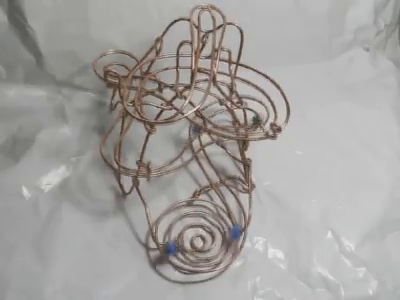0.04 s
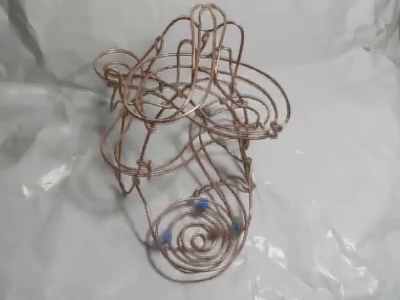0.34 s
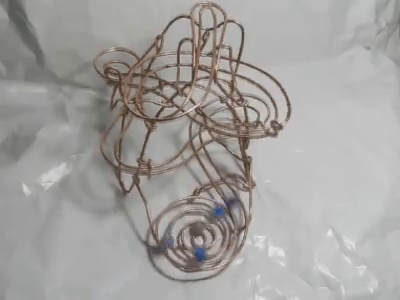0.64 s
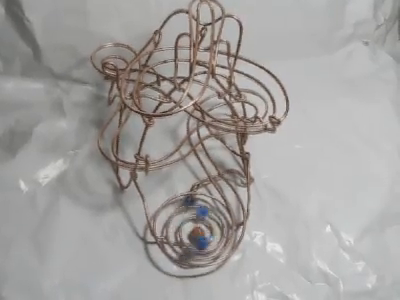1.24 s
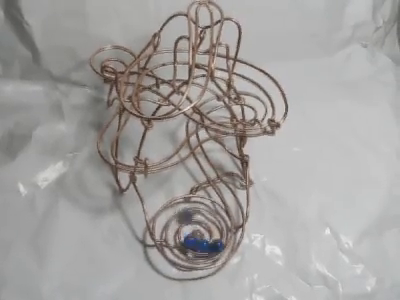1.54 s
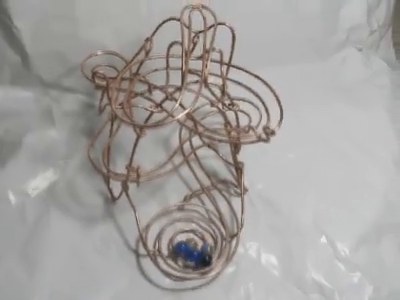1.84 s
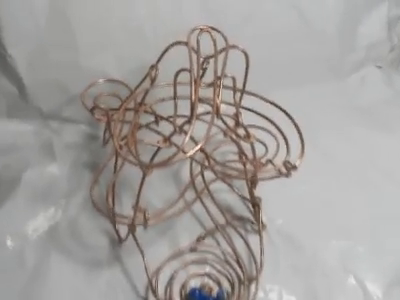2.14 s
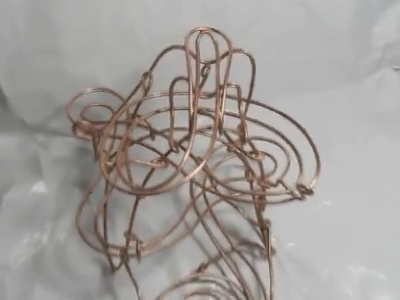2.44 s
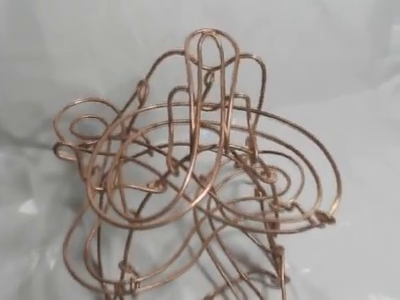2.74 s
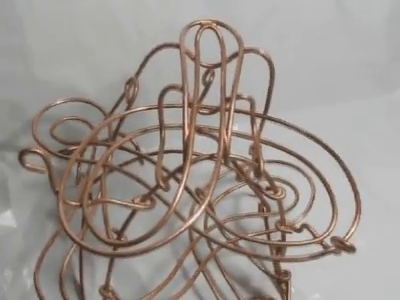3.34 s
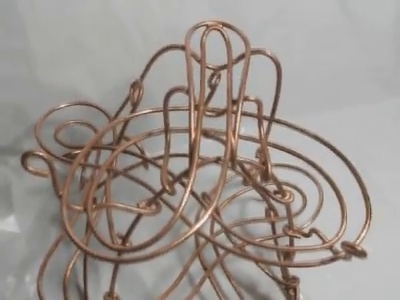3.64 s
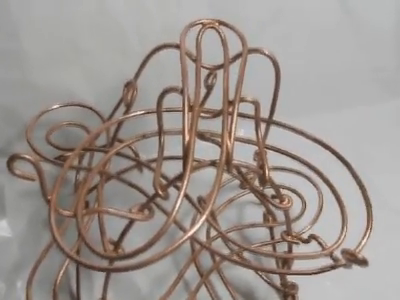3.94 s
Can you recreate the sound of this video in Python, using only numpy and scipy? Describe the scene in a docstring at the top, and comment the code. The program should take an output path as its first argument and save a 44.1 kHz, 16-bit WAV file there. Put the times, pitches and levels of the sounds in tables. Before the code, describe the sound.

Small balls roll along a wire spiral with a bright metallic rattle, a light rumble and many irregular clacks. The rolling fades from about 1.5 seconds and settles after a last sharp clack at 1.7. From 1.9 seconds, a hand on the microphone makes short hollow knocks, then softer bumps, faint rubbing and a low groan around 2.6. The balls tick occasionally in the quiet room until nearly 4 seconds.

```python
"""Small balls roll and rattle down the spiral funnel of a copper wire track, clack together at its
centre and settle. Each contact is an impulse that excites the resonant modes of the wire frame.
Then a hand moves the camera: friction and slips drive the modes of its hollow case, giving a faint
rub, short knocks and a low groan, while the balls tick now and then in a quiet room."""
import sys
import numpy as np
from scipy import signal
from scipy.fft import rfft, irfft, next_fast_len
from scipy.io import wavfile
from scipy.ndimage import uniform_filter1d, map_coordinates

SR = 44100
rng = np.random.default_rng(int(sys.argv[2]) if len(sys.argv) > 2 else 0)


def to_wav(sig):
    """Store sig (one row per channel, or 1-D mono) as 16-bit WAV at the path in sys.argv[1].

    Samples outside -1..1 are clipped; the rate is SR.
    """
    pcm = np.clip(np.atleast_2d(sig), -1, 1) * 32767
    pcm = np.round(pcm).astype(np.int16)
    wavfile.write(sys.argv[1], SR, pcm.T)  # frames by channels


N = 176400


def amp(db):
    return 10 ** (np.asarray(db) / 20)


def unit_rms(x):
    return x / np.sqrt(np.mean(x ** 2) + 1e-20)


def along(points, hz):
    """Interpolation of (frequency, value) points on a logarithmic axis."""
    f, v = np.transpose(points)
    return np.interp(np.log(hz + 1), np.log(f + 1), v)


def curves(rows):
    """Linear interpolation in time: one envelope for each column after the first."""
    times, *columns = np.transpose(rows)
    return [np.interp(np.arange(N) / SR, times, column) for column in columns]


def wobble(knots_per_s):
    """Smooth random modulation: a spline through Gaussian knots."""
    return map_coordinates(rng.standard_normal(2048), [np.arange(N) * knots_per_s / SR], mode="mirror")


def filtered(x, gain):
    """Zero-phase filtering: the spectrum is multiplied by gain(hz)."""
    size = next_fast_len(N + SR // 2)
    return irfft(rfft(x, size) * gain(np.fft.rfftfreq(size, 1 / SR)), size)[:N]


def noise(gain):
    """Spectral shaping of white noise, at unit RMS."""
    return unit_rms(filtered(rng.standard_normal(N), gain))


def resonances(modes, hz, low_hz):
    """Damped modes add in power; the body radiates little below low_hz."""
    power = sum(amp(db) ** 2 * (hz * width) ** 2 / ((centre ** 2 - hz ** 2) ** 2 + (hz * width) ** 2)
                for centre, width, db in modes)
    return np.sqrt(power / (1 + (low_hz / (hz + 1)) ** 8))


def impulse_response(gain, lag_s=0., size=4096):
    """Minimum phase plus dispersion: bending waves bring 1 kHz lag_s late, the bass later."""
    hz = np.fft.rfftfreq(size, 1 / SR)
    cepstrum = irfft(np.log(np.maximum(gain(hz), 1e-4)))
    cepstrum[1:size // 2] *= 2
    cepstrum[size // 2 + 1:] = 0
    dispersion = 4 * np.pi * lag_s * np.sqrt(1000 * hz)
    response = irfft(np.exp(rfft(cepstrum) - 1j * dispersion))
    return response / np.linalg.norm(response)


def tail(t60s):
    """Diffuse decay of unit energy: each frequency dies exponentially at its own rate."""
    hz, t, spectra = signal.stft(rng.standard_normal(SR // 4), SR, nperseg=128)
    response = signal.istft(spectra * amp(-60 * t / along(t60s, hz)[:, None]), SR, nperseg=128)[1]
    return response / np.linalg.norm(response)


def add(out, start_s, sound):
    """Superposition of a sound from start_s on."""
    i = max(round(start_s * SR), 0)
    out[i:i + len(sound)] += sound[:len(out) - i]


# Modes of the wire frame: (frequency [Hz], bandwidth [Hz], level [dB])
WIRE_MODES = [(1190, 203, -6.5), (1720, 43, -5.5), (2100, 170, -4.5), (2516, 119, 2), (3290, 196, -5.5),
              (3694, 81, -8.5), (5040, 840, -24), (6280, 430, -23), (7570, 500, -14.5), (8555, 158, -9.5),
              (9340, 1200, -25.5), (12400, 260, -17), (13580, 260, -14), (13800, 1950, -19.5)]


def wire_gain(hz):
    """Modal response of the wire frame."""
    return resonances(WIRE_MODES, hz, low_hz=567)


# Damping of the frame: (frequency [Hz], 60 dB decay time [s])
WIRE_DECAY = [(300, 0.023), (2500, 0.1), (8000, 0.15), (14000, 0.03)]


def frame_ring(bumps, step_s):
    """Dense modes ring differently as the contact point moves, over the first half of the scene."""
    out, hop = np.zeros(N), int(step_s * SR)
    for i in range(0, N // 2, hop):
        add(out, i / SR, signal.fftconvolve(bumps[i:i + hop], tail(WIRE_DECAY)))
    return out


def drifting(x, depth_db):
    """Modal coupling depends on position: bands swell and fade as the contacts travel."""
    spectra = signal.stft(x, nperseg=1024)[2]
    field = uniform_filter1d(rng.standard_normal(spectra.shape), size=5, axis=0)
    field = uniform_filter1d(field, size=9, axis=1)
    return unit_rms(signal.istft(spectra * amp(depth_db * unit_rms(field)), nperseg=1024)[1][:N])


# Rolling envelopes: (time [s], relative rumble level [dB], relative rattle level [dB])
ROLL_LEVELS = [(0, -30.5, -24), (.18, -28.5, -27.5), (.42, -29, -26.5), (.49, -27, -29.5),
               (.555, -29.5, -24.5), (.61, -28.5, -23), (.66, -35, -32.5), (.8, -33, -29), (.9, -32.5, -30),
               (1.03, -31, -26.5), (1.13, -31, -30.5), (1.21, -31, -26), (1.3, -30.5, -30.5),
               (1.39, -30.5, -27.5), (1.45, -33.5, -33), (1.49, -38.5, -40), (1.6, -37.5, -41.5),
               (1.66, -45, -47), (1.735, -34.5, -34), (1.79, -48, -52), (1.86, -59.5, -55)]
# Spectrum of the rumble: (frequency [Hz], level [dB])
RUMBLE_SPECTRUM = [(60, -31), (200, -11), (330, -7), (450, -5), (580, 2.5), (760, 0), (950, -1), (1250, 0),
                   (1800, -6), (2600, 1), (5000, -52)]


def rolling(balls=4, bumps_per_s=1300, spread_db=2.5, rattle_db=-1.5, rumble_db=-2.5):
    """Roughness excitation: balls bump over the wire, making a bright rattle above a low rumble."""
    rumble_curve, rattle_curve = curves(ROLL_LEVELS)
    rattle = np.zeros(N)
    for _ in range(balls):
        bumps = (rng.random(N) < bumps_per_s / balls / SR) * rng.choice([-1, 1], N)
        bumps = bumps * amp(spread_db * np.clip(rng.standard_normal(N), -2, 2))
        ring = amp(-4) * frame_ring(bumps, step_s=.12)
        rattle += (bumps + ring) * amp(1.2 * wobble(4.57))
    rattle = unit_rms(signal.fftconvolve(rattle, impulse_response(wire_gain, lag_s=0.001024))[:N])
    rumble = noise(lambda hz: amp(along(RUMBLE_SPECTRUM, hz)))
    flutter_db = 0.55 * wobble(90.5)
    rattle = drifting(rattle, depth_db=2) * amp(rattle_db + rattle_curve + flutter_db)
    rumble = drifting(rumble, depth_db=2) * amp(rumble_db + rumble_curve + 0.3 * flutter_db)
    settling, = curves([(1.82, 1), (1.92, 0.53)])
    return settling * (rattle + rumble)


# Spectrum of the room noise: (frequency [Hz], level [dB])
AIR_SPECTRUM = [(20, -18.5), (55, -11.5), (119, -16.5), (190, -10), (280, -18), (360, -10), (666, -13.5),
                (820, -10), (1110, -18), (1250, -17), (1750, -22), (3440, -23), (4150, -26.5), (10900, -36),
                (13900, -37), (15500, -36)]
# Faint resonances in that noise: (frequency [Hz], bandwidth [Hz], level [dB])
AIR_PEAKS = [(2300, 53, 2.5), (3320, 87, -3), (7720, 320, -11), (8900, 200, -23), (10400, 200, -16),
             (12300, 500, -21), (13760, 300, -17)]
# Envelope of the room noise: (time [s], level [dB])
AIR_LEVELS = [(0, -38), (1.9, -49.5), (2.3, -48), (2.8, -45.5), (4, -45.5)]


def background(hum_hz=117.4, hum_db=-64.5):
    """Ambient noise floor: broadband room noise with faint resonances, and a tonal mains hum."""
    level_db, = curves(AIR_LEVELS)
    air = noise(lambda hz: amp(along(AIR_SPECTRUM, hz)))
    air += amp(-13.5) * noise(lambda hz: resonances(AIR_PEAKS, hz, low_hz=1500))
    hum = unit_rms(np.sin(2 * np.pi * hum_hz * np.arange(N) / SR))
    return air * amp(level_db) + hum * amp(hum_db)


def chatter(decay_s, grit_db):
    """Contact bounce: one impulse, then a spectrally flat burst of tiny rebounds."""
    t = np.arange(SR // 10) / SR
    fade = amp(-60 * t / decay_s)
    spectrum = rfft(rng.standard_normal(len(t)) * fade)
    burst = irfft(spectrum / np.abs(spectrum), len(t)) * np.sqrt(fade)
    burst *= amp(grit_db) / np.linalg.norm(burst)
    burst[0] += 1
    return burst / np.linalg.norm(burst)


# Balls striking the wire and each other: (time [s], relative level [dB], chatter decay [s])
BALL_IMPACTS = [(0.0265, -5, 0.17), (0.058, -9, 0.15), (0.2771, -7.5, 0.076), (.298, -10.5, 0.081),
                (.389, -9, 0.055), (.4045, -6, 0.076), (0.525, -14, 0.049), (.556, -13.5, 0.029),
                (0.5927, -12, 0.028), (0.6276, -8, 0.075), (0.6337, -7, 0.034), (0.679, -11, 0.077),
                (0.717, -13, 0.046), (.744, -19, .03), (0.785, -20, 0.025), (.818, -9.5, 0.094),
                (.8335, -12, .06), (0.885, -12, 0.087), (.967, -11, .06), (.983, -13.5, .04),
                (1.0325, -8.5, 0.11), (1.1822, -11.5, 0.036), (1.2012, -9.5, 0.073), (1.256, -12, 0.083),
                (1.3356, -7, 0.054), (1.371, -6, 0.051), (1.421, -7, 0.072), (1.4465, -9, 0.041),
                (1.49, -19, .03), (1.7049, -21, 0.03), (1.7155, -6.5, 0.039), (1.731, -19.5, 0.043),
                (1.743, -24, .04)]


def clacks(gain_db=11, focus=0.83, focus_per_s=4):
    """Impact excitation of the frame: the longer a ball chatters, the more the main modes stand out."""
    out = np.zeros(N)
    brightness = [(800, -1.5), (2500, 3), (5000, 8), (14000, 0)]  # (frequency [Hz], gain [dB])
    for start_s, db, decay_s in BALL_IMPACTS:
        gain = lambda hz: wire_gain(hz) ** (focus + focus_per_s * decay_s) * amp(along(brightness, hz))
        ring = impulse_response(gain, lag_s=0.000989)
        add(out, start_s, amp(gain_db + db) * signal.fftconvolve(chatter(decay_s, grit_db=19), ring))
    return out


# Light contacts between balls: (time [s], relative level [dB], share of ping [0-1])
BALL_TOUCHES = [(1.583, -26, 0.1), (1.619, -25.5, 0), (1.635, -30, 0), (1.758, -25, 0), (1.777, -31, 0.3),
                (1.8735, -22.5, 0.1), (2.346, -39, 0), (2.3734, -23, 0.1), (2.5544, -30, 0),
                (2.7182, -22.5, 0.53), (2.9317, -22, 0.18), (3.1357, -28.5, 0), (3.584, -25.5, 0)]
# Spectrum of a tick: (frequency [Hz], level [dB])
TICK_SPECTRUM = [(300, -19), (1200, -16), (1900, -9), (2500, -0.5), (4700, -4), (7000, -6.5), (9000, -14),
                 (11500, -22), (14500, -17)]
# Modes of a short span of wire: (frequency [Hz], level [dB], 60 dB decay time [s])
PING_MODES = [(4640, -3.5, 0.05), (5420, -9, .035), (6379, -3.5, 0.034), (14600, -8, .03)]


def ticks(tick_db=11.5, ping_db=-1):
    """Light impacts as the balls shift; some set a short span of wire into free vibration."""
    out = np.zeros(N)
    ring = impulse_response(lambda hz: amp(along(TICK_SPECTRUM, hz)))
    t = np.arange(SR // 8) / SR
    ping = sum(amp(db - 60 * t / t60) * np.sin(2 * np.pi * hz * t) for hz, db, t60 in PING_MODES)
    for start_s, db, share in BALL_TOUCHES:
        add(out, start_s, amp(tick_db + db) * signal.fftconvolve(chatter(0.063, grit_db=4), ring))
        add(out, start_s, amp(ping_db + db) * share * ping)
    return out


# Modes of the camera case: (frequency [Hz], bandwidth [Hz], level [dB])
CASE_MODES = [(360.2, 19, 4), (469, 39, 2.5), (606, 29, 3.5), (665, 54, 4), (945, 57, 1.5),
              (1122, 97, -5.5), (1247, 49, -3), (1400, 72, -6), (1630, 96, -8.5), (2605, 260, -8),
              (3210, 120, -12.5), (8160, 690, -18), (9560, 150, -17), (10370, 48, -19.5),
              (11480, 100, -16.5), (13050, 370, -18.5), (13600, 620, -26)]
# Hand rubbing the case: (time [s], relative level [dB])
RUB_LEVELS = [(1.9, -11), (2.35, -9), (2.42, -13), (2.55, -1), (2.68, 1), (2.75, -1.5), (3.0, -4), (3.1, 6),
              (3.2, -10), (3.32, 3.5), (3.62, -1), (3.76, 9.5), (3.83, -3.5), (4, 3)]


def rub(gain_db=-49):
    """Friction noise from the hand, filtered by the modes of the case."""
    level_db, = curves(RUB_LEVELS)
    colour = [(600, 6), (1300, -3.5), (3000, -11), (10000, 0)]  # (frequency [Hz], gain [dB])
    friction = noise(lambda hz: resonances(CASE_MODES, hz, low_hz=306) * amp(along(colour, hz)))
    return friction * amp(gain_db + level_db + 1.4 * wobble(40))


# Slips of the case: (time [s], relative level [dB], hardness [dB], hollow boost [dB])
CASE_SLIPS = [(1.9466, -17.5, 0.5, 9), (2.0019, -19, 2.5, 10), (2.0238, -19.5, 2, 9),
              (2.0499, -18.5, 1.5, 12), (2.1712, -20.5, 7.5, 0), (2.2333, -20.5, 4.5, 1),
              (2.2895, -20.5, -0.5, -6), (2.3839, -20.5, 1, -11), (2.4061, -32.5, -5, 0),
              (2.4276, -36, -15, 17), (2.484, -27, -11, -2), (2.594, -24, -14, -4), (2.7067, -33, -19, 16),
              (2.8211, -41, 3, -1), (3.0554, -36, -26, 12), (3.0793, -30.5, -21, 1),
              (3.228, -28.5, -12, -5), (3.2492, -31, -15, 2), (3.3024, -30, -25, 13), (3.3569, -33, -18, 6),
              (3.386, -29.5, -16, -4), (3.406, -28, -10, -8), (3.5218, -22, -6.5, -23),
              (3.7032, -27.5, -12, -8), (3.723, -27, -12, 14), (3.7462, -30, -15, -2),
              (3.8593, -24, -8.5, -10)]
# Bands that a hard slip brightens: (frequency [Hz], share of the hardness [0-1])
HARD_BANDS = [(700, 0), (1300, 0.16), (1900, 0.36), (2700, 0.97), (6000, 0.54), (8200, 0.99), (9700, 0.068),
              (14000, 0.72)]
# Hollow bands of the case: (frequency [Hz], share of the boost [0-1])
HOLLOW_BANDS = [(450, 0.33), (600, 0.64), (740, 0.51), (900, 0.3), (1050, 0.19), (1150, 0.5), (1300, 0.26),
                (1450, 0.32)]
# Cancellation on the way from case to microphone: (frequency [Hz], gain [dB])
CASE_PATH = [(700, -4.5), (830, -17.5), (1060, -8), (1130, -0.5), (1700, 1), (2150, -1), (2550, -2.5),
             (3300, 0.5), (3650, -3.5), (4300, -0.5), (8000, -3.5)]


def knocks(gain_db=24.5, scatter_db=2.0, crossover_hz=4500):
    """Impulse response of the slipping case; its joint cracks and buzzes briefly in the treble."""
    out = np.zeros(N)
    low, high = (signal.butter(2, crossover_hz, kind, fs=SR, output="sos") for kind in ("low", "high"))
    for start_s, db, hard_db, hollow_db in CASE_SLIPS:
        modes = [(centre, width, level + scatter_db * rng.standard_normal())
                 for centre, width, level in CASE_MODES]
        colour_db = lambda hz: hard_db * along(HARD_BANDS, hz) + hollow_db * along(HOLLOW_BANDS, hz)
        gain = lambda hz: resonances(modes, hz, low_hz=320) * amp(colour_db(hz) + along(CASE_PATH, hz))
        ring = impulse_response(gain, lag_s=0.001125)
        crack = amp(-1) * chatter(0.013, grit_db=7)
        buzz = amp(-5) * chatter(0.036, grit_db=18)
        thump = signal.sosfilt(low, signal.unit_impulse(len(crack)))
        slip = thump + signal.sosfilt(high, crack + buzz)
        add(out, start_s, amp(gain_db + db) * signal.fftconvolve(slip, ring))
    return out


# Firm drag of the hand: (time [s], level [dB])
DRAG_LEVELS = [(2.3, -77), (2.4, -42.5), (2.47, -54), (2.53, -42.5), (2.58, -56), (2.61, -35), (2.645, -41),
               (2.675, -38.5), (2.72, -50), (2.8, -58), (3.6, -50), (3.75, -51), (3.85, -59), (4, -51)]
# Lowest modes of the gripped case: (frequency [Hz], bandwidth [Hz], level [dB])
GRIP_MODES = [(364, 33, -9.5), (448, 18, -6)]


def drag():
    """Forced vibration: a firm drag of the hand makes the case groan in its lowest modes."""
    level_db, = curves(DRAG_LEVELS)
    tilt = [(480, -8), (900, -7)]  # (frequency [Hz], gain [dB])
    groan = noise(lambda hz: resonances(GRIP_MODES, hz, low_hz=330) * amp(along(tilt, hz)))
    return groan * amp(level_db)


# Reverberation of the room: (frequency [Hz], 60 dB decay time [s])
ROOM_DECAY = [(200, 0.085), (2000, 0.2), (12000, 0.29)]


def scene(track_room_db=-14, case_room_db=-23):
    """Direct plus reverberant sound: the case, right at the microphone, is drier than the track."""
    track = rolling() + clacks() + ticks()
    case = knocks()
    into_room = amp(track_room_db) * track + amp(case_room_db) * case
    reverb = signal.fftconvolve(into_room, tail(ROOM_DECAY))[:N]
    return (track + case + reverb + background() + rub() + drag())[None]


def record(dry, top_hz=15900, dc_offset=.007):
    """Band limiting in the camera, whose converter rests slightly off zero."""
    return filtered(dry[0], lambda hz: hz < top_hz)[None] + dc_offset


dry = scene()
out = record(dry)
to_wav(out)
```